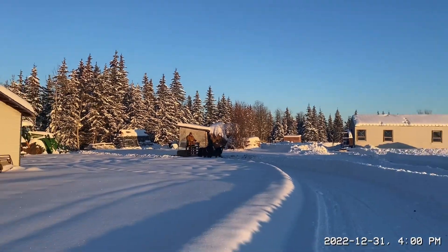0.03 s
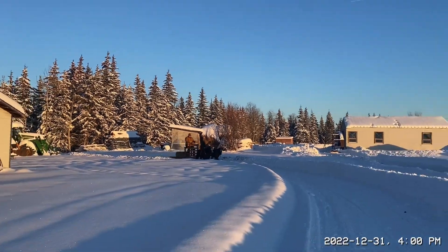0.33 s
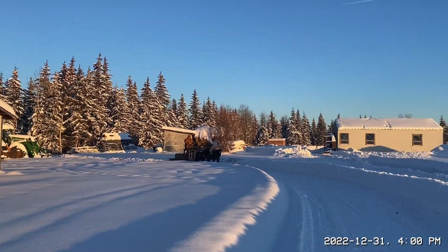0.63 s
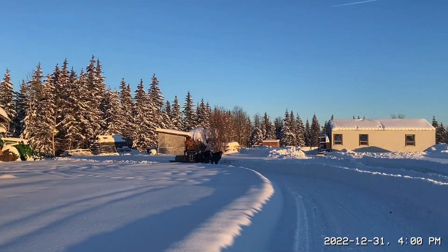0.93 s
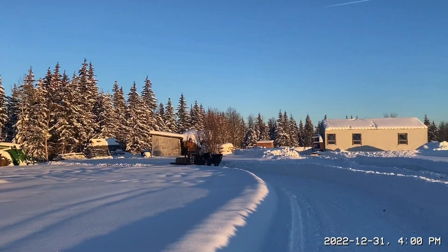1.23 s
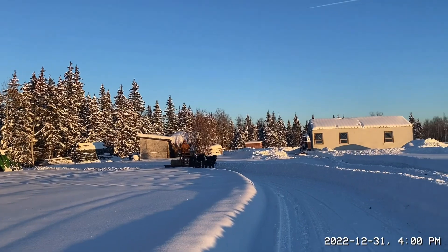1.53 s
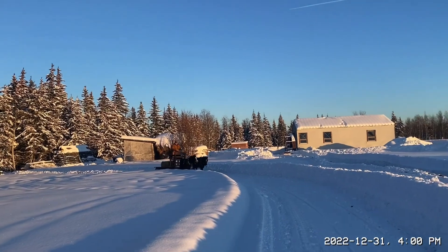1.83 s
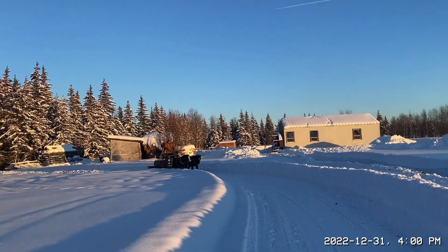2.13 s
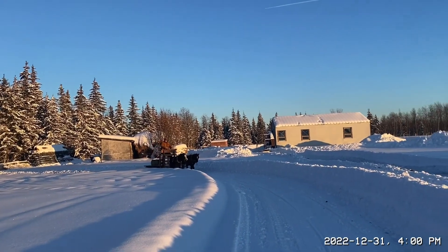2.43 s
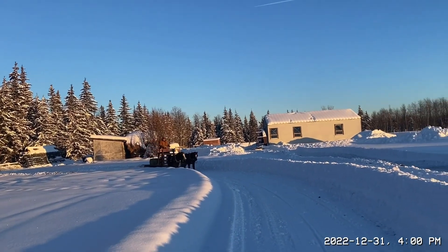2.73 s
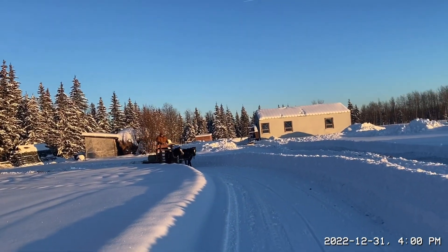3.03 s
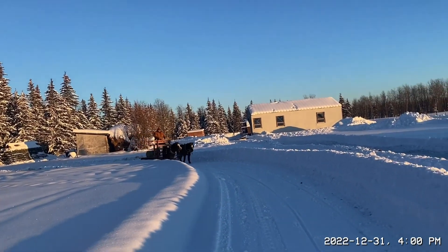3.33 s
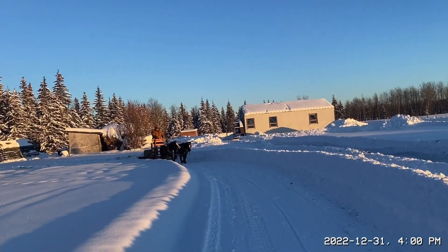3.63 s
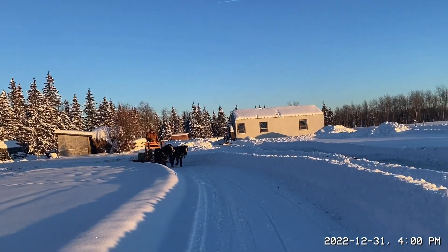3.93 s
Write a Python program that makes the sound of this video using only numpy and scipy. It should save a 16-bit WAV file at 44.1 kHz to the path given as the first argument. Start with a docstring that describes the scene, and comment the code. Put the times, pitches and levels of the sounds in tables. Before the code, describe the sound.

Sleigh bells jingle brightly throughout, outdoors in light wind with no echo. Faint leather creaks and clothing rustle come first, then a few footsteps near the microphone crunch and crack through crusted snow as the bells keep going.

```python
"""Small bells jingle over light wind, a faint jacket rustle and creaking leather: a horse-drawn sleigh
comes slowly along a snowy road. The horses' gait throws pellets against the bells' shells, which ring
in their normal modes. Close by, boots press into cold packed snow: it crunches in countless tiny
fractures, and its crust snaps with short chirps that fall because bending waves are dispersive."""
import sys
import numpy as np
from scipy import signal
from scipy.fft import rfft, irfft
from scipy.io import wavfile

SR = 44100
rng = np.random.default_rng(int(sys.argv[2]) if len(sys.argv) > 2 else 0)


def output_pcm(signal):
    """Save a mono or channel-first signal as 16-bit PCM at the path in sys.argv[1].

    Samples are clipped to [-1, 1] before scaling.
    """
    pcm = np.clip(np.atleast_2d(signal).T, -1, 1) * 32767
    wavfile.write(sys.argv[1], SR, np.round(pcm).astype(np.int16))


N = 176400
T = np.arange(N) / SR

# Normal modes of the bells in four registers: f/Hz, level/dB
HUM = [(2045, -8.5), (2090, -6), (2132, -2), (2148, -4), (2170, -9.5)]
MIDDLE = [(4861, -20), (4927, -10), (4955, -11.5), (5670, -13.5), (5701, 4), (5762, -2.5), (7431, -10),
          (7603, -1)]
BRIGHT = [(8457, -4), (8624, 1.5), (8742, -3.5), (9008, -2), (9124, -4), (9191, -4)]
TOP = [(13365, -3.5), (13528, -6), (13948, -1.5), (14023, 0), (14115, 0), (14178, -6), (14936, -1.5),
       (15160, -8), (15270, -7)]
# Registers: modes, jolt offset/dB, rattle level/dB, rattle growth/(dB/s), 60 dB decay time/s
REGISTERS = [(HUM, -6, -54, 1.1, 0.29), (MIDDLE, -7, -62, -0.46, 0.41),
             (BRIGHT, -11, -61, 1.54, 0.22), (TOP, -6.5, -65, 0.17, 0.25)]
# Jolts of the bells: t/s, level/dB, hum, middle and top offsets/dB, leading bell f/Hz
GAIT_JOLTS = [(0.273, -45.5, -3, -6, 2.5, 8630), (0.419, -42.5, -3, -3, -7, 8740),
              (0.485, -41.5, -2.5, -14, -2.5, 9010), (0.649, -46, -3, -0.5, -4, 8630),
              (0.71, -36.5, -7, -29, -22, 8630), (0.765, -39, -16, -19, -18, 8630),
              (0.83, -38.5, -18, -18, -18, 8630), (0.953, -29.5, -25, -24, -18, 9010),
              (0.989, -31, -31, -39, -30, 9010), (1.103, -32.5, -9.5, -17.5, -33, 9190),
              (1.174, -34.5, -20, -16.5, -29, 8630), (1.278, -29.5, -9.5, -16, -21, 9010),
              (1.311, -48, -5, -2, -18, 8630), (1.492, -39, 0, -8.5, -5, 8630),
              (1.764, -40.5, -7, -10, -12, 8630), (1.833, -38, -7, -17, -27, 8450),
              (1.888, -35, -7, -9.5, -20, 8740), (2.018, -29, -8, -14.5, -11, 8630),
              (2.049, -34.5, -8, -30, -14, 8630), (2.1, -40.5, -10, -15, -5, 8630),
              (2.179, -38, -9, -9.5, -15, 9190), (2.255, -38.5, -3, -22, -17, 9010),
              (2.321, -28.5, -4.5, -18.5, -17, 9010), (2.376, -31.5, -8, -15.5, -17, 9120),
              (2.48, -38.5, -5, -13, -20, 9010), (2.555, -32, -1.5, -16, -15, 9010),
              (2.683, -33, -18, -13.5, -22, 9010), (2.805, -38.5, 2.5, -10, -11, 8450),
              (2.845, -42.5, 3.5, -10, -8, 8450), (2.96, -43.5, 1, -12, -9, 9120),
              (3.03, -38.5, 1, -10, -9, 9010), (3.064, -34.5, 1, -11.5, -5, 9010),
              (3.091, -32, -3.5, -15, -12, 8450), (3.118, -36, -3, -24, -15, 9120),
              (3.154, -37, -10, -8.5, -7, 8630), (3.193, -35.5, -22, -10, -8, 8450),
              (3.249, -39.5, -10, -9, -16, 9190), (3.344, -37, 6.5, -16, -10, 8630),
              (3.379, -42.5, 2, -20, -9, 8630), (3.499, -40, -11, -19, -17, 8630),
              (3.578, -30, -13, -22, -18, 9010), (3.631, -24, -14, -24, -17, 9010),
              (3.67, -39, -4, -13.5, -18, 9120), (3.749, -39.5, 4, -12.5, -11, 9010),
              (3.809, -45, 8.5, -13, -5, 9120), (3.866, -37, -2, -12, -5.5, 9010),
              (3.927, -31.5, -1, -16.5, -9, 9120), (3.973, -31.5, -2, -19, -18, 8740)]
# Single bells singing out: t/s, level/dB, f/Hz
FREE_RINGS = [(0.085, -53, 4970), (0.43, -53, 4920), (0.447, -52, 7500), (0.56, -53, 7433),
              (0.775, -48, 13530), (0.88, -54.5, 4960), (1.35, -57, 6242), (1.28, -51, 4890),
              (1.312, -39.5, 2148), (1.61, -49, 7603), (1.901, -55, 6242), (2.352, -38.5, 2138),
              (2.85, -44.5, 2152), (2.955, -37, 2119), (3.07, -53, 5715), (3.655, -55, 4860),
              (3.81, -45, 7550), (3.845, -35, 2124)]
# Spectra of wind, hiss, cloth and leather: f/Hz, level/dB
WIND_SPECTRUM = [(20, -24), (40, -6), (68, 1), (110, -7.5), (200, -10), (400, -20), (800, -25),
                 (1600, -19.5), (2500, -15.5), (3600, -61)]
HISS_SPECTRUM = [(1500, -4), (3500, -8.5), (4500, -1), (6800, -6.5), (10000, -6), (15500, -27)]
RUSTLE_SPECTRUM = [(3500, -18), (4500, -11), (5400, 0), (7000, 4.5), (8700, 2.5), (10000, -4.5), (11500, 0),
                   (13000, -6), (15500, -19)]
CREAK_SPECTRUM = [(1500, -21), (2000, -1), (2300, -3), (2550, 0.5), (2800, 1), (3100, -33), (5000, -21.5)]
# Envelopes of rustling cloth and creaking leather: t/s, level/dB
RUSTLE_LEVEL = [(0, -64), (0.3, -70), (0.5, -61.5), (0.7, -63), (0.9, -58), (1.05, -63), (1.4, -61),
                (1.7, -64), (2.05, -58), (2.2, -63.5), (2.55, -64), (2.8, -62), (2.93, -63.5), (3.2, -58.5),
                (3.5, -60.5), (3.7, -57), (4, -59)]
CREAK_LEVEL = [(0, -64.5), (0.33, -62), (0.6, -60), (0.85, -69), (1.05, -71), (1.3, -57), (1.45, -70),
               (1.7, -65)]
# Cloth brushing on cloth: t/s, duration/s, level/dB, f/Hz
CLOTH_BRUSHES = [(0.028, 0.92, -69.5, 4500), (0.429, 0.13, -57.5, 5850), (0.855, 0.03, -60, 4700),
                 (1.079, 0.092, -50, 9700), (1.184, 0.17, -53.5, 9800), (3.327, .03, -48, 8030),
                 (3.356, 0.018, -46, 6940)]
# Clinks of small fittings: t/s, level/dB, f/Hz, 60 dB decay time/s
FITTING_CLINKS = [(0.357, -47.5, 10500, 0.087), (0.595, -40.5, 1470, 0.028), (1.03, -49, 12050, .06),
                  (1.108, -36.5, 1510, 0.027), (1.148, -40, 1680, .025), (1.192, -46, 10900, .07)]
# Envelopes of the snow's sliding powder, crunch and groan: t/s, level/dB
POWDER_LEVEL = [(0, -63), (1.05, -67.5), (1.45, -58.5), (1.62, -57), (1.87, -56.5), (2.05, -49.5),
                (2.3, -54.5), (2.5, -56), (2.67, -50.5), (2.685, -36.5), (2.70, -53), (2.77, -53),
                (2.82, -47), (3.0, -57), (3.15, -51), (3.22, -60), (3.232, -37), (3.245, -51), (3.55, -52),
                (3.78, -51.5), (4, -52)]
CRUNCH_LEVEL = [(0, -64.5), (1.08, -62.5), (1.14, -50.5), (1.2, -64.5), (1.43, -66), (1.47, -46),
                (1.51, -51.5), (1.58, -39.5), (1.62, -40), (1.67, -45.5), (1.75, -50.5), (1.88, -49),
                (1.93, -56), (2.02, -44.5), (2.07, -53.5), (2.3, -57.5), (2.5, -57.5), (2.64, -51.5),
                (2.68, -46.5), (2.74, -59.5), (2.83, -46), (2.9, -46), (2.97, -35.5), (3.04, -40),
                (3.1, -53.5), (3.22, -50.5), (3.33, -52.5), (3.5, -48), (3.58, -44), (3.63, -43),
                (3.78, -37), (3.84, -40), (3.88, -54), (4, -52.5)]
GROAN_LEVEL = [(0, -80), (1.5, -68), (1.65, -45), (1.85, -52), (2.1, -63), (2.9, -65.5), (3.0, -69),
               (3.1, -94), (3.52, -52), (3.63, -44.5), (3.8, -43), (3.87, -58), (4, -72)]
# Spectra of the same three: f/Hz, level/dB
POWDER_SPECTRUM = [(600, -63), (1500, 2.5), (2400, 2), (3000, -4.5), (3600, -5), (4400, -23.5), (8000, -39)]
CRUNCH_SPECTRUM = [(60, -19), (150, 2), (300, 0.5), (800, 1), (1400, -1), (2000, -1.5), (2700, -17),
                   (3600, -11.5), (4400, -32), (8000, -96)]
GROAN_SPECTRUM = [(50, -40), (120, -10.5), (200, -2.5), (400, -6), (800, -52), (2000, -49.5)]
# Fractures of the crust: t/s, level/dB, centre f/Hz
CRUST_SNAPS = [(1.579, -36, 800), (1.596, -39, 900), (1.608, -36, 1100), (1.62, -37, 1300),
               (1.643, -32, 780), (1.653, -36, 1050), (1.667, -27.5, 710), (1.676, -27.5, 990),
               (1.696, -30.5, 706), (1.716, -28.5, 643), (1.736, -28.5, 770), (1.762, -35, 510),
               (1.813, -32.5, 505), (1.847, -37, 471), (1.882, -33, 851), (1.948, -30.5, 750),
               (1.97, -30.5, 686), (1.995, -30.5, 577), (2.009, -31.5, 746), (2.032, -33, 1020),
               (2.178, -33.5, 770), (2.21, -34.5, 666), (2.219, -34, 503), (2.264, -27.5, 740),
               (2.352, -26.5, 780), (2.981, -29, 800), (3.009, -26.5, 1070), (3.023, -27.5, 845),
               (3.254, -21.5, 800), (3.272, -29.5, 708), (3.301, -20.5, 830), (3.394, -29, 860),
               (3.434, -25, 1030), (3.695, -29.5, 604), (3.902, -29, 1690), (3.955, -29, 1600)]
# Snow giving under a heel: t/s, level/dB, f/Hz
HEEL_THUDS = [(1.77, -35, 213), (1.824, -43, 230), (1.852, -35.5, 191), (1.976, -29.5, 197),
              (2.022, -35, 161), (2.155, -38.5, 150), (2.271, -39, 122), (2.575, -38.5, 137),
              (3.258, -34.5, 272), (3.302, -28, 278), (3.62, -31, 158), (3.766, -34, 191)]

CRUST_TRAVEL_S = 0.00239   # group delay at 1 kHz


def from_db(db):
    """Amplitude grows tenfold with every 20 dB."""
    return 10 ** (np.asarray(db) / 20)


def unit_power(x):
    """Division by the RMS amplitude gives unit power."""
    return x / np.sqrt(np.mean(x ** 2) + 1e-20)


def envelope(rows):
    """Exponential growth or decay joins (t/s, level/dB) points."""
    return from_db(np.interp(T, *np.transpose(rows)))


def add(out, s, sound):
    """Superposition: a sound joins the mix at time s."""
    i = int(max(s, 0) * SR)
    if i < N:
        out[i:i + len(sound)] += sound[:N - i]


def dispersion(hz, travel_s):
    """Bending waves speed up with the root of frequency; travel_s is the delay at 1 kHz."""
    return np.exp(-4j * np.pi * travel_s * np.sqrt(1000 * hz))


def coloured(x, spectrum, travel_s=0):
    """Linear filtering imposes a spectrum and optional dispersion; the result has unit power."""
    hz = np.maximum(np.arange(N // 2 + 1) * SR / N, 1)
    points_hz, db = np.transpose(spectrum)
    gain = from_db(np.interp(np.log(hz), np.log(points_hz), db))
    return unit_power(irfft(rfft(x) * gain * dispersion(hz, travel_s), N))


def grains(per_s=1500, spread_db=3):
    """Shot noise: independent clicks of uneven size."""
    sizes = from_db(spread_db * np.minimum(rng.exponential(1, N), 4)) * rng.choice([-1, 1], N)
    return sizes * (rng.random(N) < per_s / SR)


def bell_strike(modes, t60, lead_hz=0):
    """Impacts excite the shells' damped modes; those near lead_hz tend to ring sooner and louder."""
    lead_width_hz, lead_db, spread_db, detune_hz = 41, 3.5, 5.5, 9.98
    stagger_s, attack_s = 0.006, 0.0008
    t = np.float32(T[:int(.3 * SR)])
    hz, db = np.transpose(modes)
    lead = np.exp(-((hz - lead_hz) / lead_width_hz) ** 2)
    lag = np.minimum(rng.exponential(1, len(hz)), 4) * stagger_s * (1 - lead)
    hz = hz + detune_hz * rng.laplace(size=len(hz))
    gain = from_db(db + lead_db * lead + spread_db * rng.standard_normal(len(hz)))
    gain *= np.linalg.norm(from_db(db)) / np.linalg.norm(gain)   # same total energy in each strike
    phase = np.float32(2 * np.pi * hz[:, None]) * t + np.float32(2 * np.pi * rng.random((len(hz), 1)))
    swell = 1 - np.exp(-t / attack_s)   # while the pellet skitters
    rings = np.sin(phase) * np.float32(swell * from_db(-60 * t / t60))
    out = np.zeros(len(t))
    for ring, g, i in zip(rings, gain, ((lag - lag.min()) * SR).astype(int)):
        out[i:] += g * ring[:len(t) - i]
    return out


def bells(bounce_s=0.014, bounce_db=-5, rattles_per_s=40):
    """Inertia throws the pellets against the shells at each jolt; they rebound once and rattle loosely."""
    out = np.zeros(N)
    for s, db, hum, middle, top, lead_hz in GAIT_JOLTS:
        rebound = s + bounce_s * rng.uniform(.5, 2)
        for (modes, jolt_db, _, _, t60), tone_db in zip(REGISTERS, (hum, middle, 0, top)):
            for onset, loss_db in ((s, 0), (rebound, bounce_db)):
                gain = from_db(db + tone_db + jolt_db + loss_db)
                add(out, onset, gain * bell_strike(modes, t60, lead_hz))
    for k, (jitter, force) in enumerate(rng.random((int(rattles_per_s * N / SR), 2))):
        s = (k + jitter) / rattles_per_s
        for modes, _, rattle_db, growth, t60 in REGISTERS:
            add(out, s, (.5 + force) * from_db(rattle_db + growth * s) * bell_strike(modes, t60))
    return out


def wind():
    """Steady broadband noise: the low rumble of light wind and a thin hiss."""
    rumble = from_db(-57) * coloured(rng.standard_normal(N), WIND_SPECTRUM)
    hiss = from_db(-67.5) * coloured(rng.standard_normal(N), HISS_SPECTRUM)
    return rumble + hiss


def jacket():
    """Friction in stiff cloth gives dense ticks, and swishes where it brushes against itself."""
    rustle = coloured(grains(per_s=5000, spread_db=2.5), RUSTLE_SPECTRUM)
    out = from_db(3) * envelope(RUSTLE_LEVEL) * rustle
    for s, duration, db, hz in CLOTH_BRUSHES:
        rub = coloured(grains(per_s=2000), [(hz / 2, -30), (hz, 0), (hz * 2, -45)])
        count = int(duration * SR)
        add(out, s, from_db(db) * rub[:count] * signal.windows.tukey(count))
    return out


def leather(slips_per_s=32, spread_db=11):
    """Stick-slip friction makes leather creak: uneven impulses, each smeared by dispersion."""
    slips = np.zeros(N)
    for k, (jitter, size, sign) in enumerate(rng.random((int(slips_per_s * N / SR), 3))):
        add(slips, (k + jitter) / slips_per_s, [from_db(spread_db * size) * np.sign(sign - .5)])
    return envelope(CREAK_LEVEL) * coloured(slips, CREAK_SPECTRUM, travel_s=0.003)


def fittings(ticks_per_s=110, low_hz=5620, high_hz=12700, tick_t60=0.0098):
    """Each impact of buckles and fittings excites one damped mode: a few clinks and many tiny ticks."""
    tick_db, spread_db, rise_db_per_octave = -59, 4, 1.5
    out, t = np.zeros(N), T[:SR // 10]
    impacts = list(FITTING_CLINKS)
    for when, size, pitch in rng.random((int(ticks_per_s * N / SR), 3)):
        octaves = pitch * np.log2(high_hz / low_hz)
        db = tick_db + spread_db * min(-np.log(size), 3) + rise_db_per_octave * octaves
        impacts.append((when * N / SR, db, low_hz * 2 ** octaves, tick_t60))
    for s, db, hz, t60 in impacts:
        add(out, s, from_db(db - 60 * t / t60) * np.sin(2 * np.pi * hz * t))
    return out


def free_bells(t60=0.59, attack_s=0.0022):
    """Free vibration: a bell swings clear of the strap and one mode rings longer."""
    out, t = np.zeros(N), T[:SR // 2]
    swell = 1 - np.exp(-t / attack_s)
    for s, db, hz in FREE_RINGS:
        add(out, s, from_db(db - 60 * t / t60) * swell * np.sin(2 * np.pi * hz * t))
    return out


def snow_lumps(per_s=130, low_hz=317, high_hz=1494, cycles_to_peak=0.625):
    """Lumps of packed snow give way; heavy damping keeps their knocks short and dull."""
    out, t = np.zeros(N), T[:SR // 25]
    for k, (jitter, size, pitch) in enumerate(rng.random((int(per_s * N / SR), 3))):
        hz = low_hz * (high_hz / low_hz) ** pitch
        age = hz * t / cycles_to_peak
        knock = age * np.exp(-age) * np.sin(2 * np.pi * hz * t)
        add(out, (k + jitter) / per_s, (.5 + size) * np.sqrt(hz) * knock)
    return unit_power(out)


def snow_crunch():
    """Brittle fracture under a boot gives countless clicks; full weight adds a groan; powder slides."""
    breaks = coloured(grains(), CRUNCH_SPECTRUM, CRUST_TRAVEL_S)
    groan = envelope(GROAN_LEVEL) * coloured(grains(), GROAN_SPECTRUM, CRUST_TRAVEL_S)
    powder = from_db(-0.5) * envelope(POWDER_LEVEL) * coloured(grains(), POWDER_SPECTRUM)
    crunch = envelope(CRUNCH_LEVEL) * (from_db(-1.5) * breaks + from_db(-6.5) * snow_lumps())
    return crunch + groan + powder


def crust_snaps(width_octaves=0.75, absorbed_above_hz=2250, jump_gap_s=0.001857, advance_s=0.00017):
    """A crack runs through the crust in two jumps; dispersion turns each into a falling chirp."""
    out, size = np.zeros(N), 4096
    hz = np.maximum(np.arange(size // 2 + 1) * SR / size, 1)
    transmission = dispersion(hz, CRUST_TRAVEL_S) / (1 + (hz / absorbed_above_hz) ** 6)
    for s, db, centre_hz in CRUST_SNAPS:
        band = np.exp(-.5 * (np.log2(hz / centre_hz) / width_octaves) ** 2)
        for lag, loss_db in ((0, -0.5), (jump_gap_s * rng.uniform(0.53, 1.61), -3)):
            chirp = irfft(band * transmission * np.exp(2j * np.pi * rng.random()))
            add(out, s - advance_s + lag, from_db(db + loss_db) * chirp / np.abs(chirp).max())
    return out


def heel_thuds(rise_s=0.0024):
    """Snow yields under a heel with a low, heavily damped oscillation."""
    out, t = np.zeros(N), T[:4096]
    pulse = t / rise_s * np.exp(1 - t / rise_s)
    for s, db, hz in HEEL_THUDS:
        add(out, s, from_db(db) * pulse * np.sin(2 * np.pi * hz * t))
    return out


def scene():
    """In a free field the sources add without echoes, here in one channel."""
    mix = wind() + snow_crunch() + jacket() + leather() + fittings()
    mix += crust_snaps() + heel_thuds() + bells() + free_bells()
    return mix[None]


def record(dry, cutoff_hz=15800):
    """An elliptic low-pass filter cuts the highest treble steeply."""
    return signal.sosfilt(signal.ellip(14, .1, 90, cutoff_hz, fs=SR, output="sos"), dry)


dry = scene()
out = record(dry)
output_pcm(out)
```